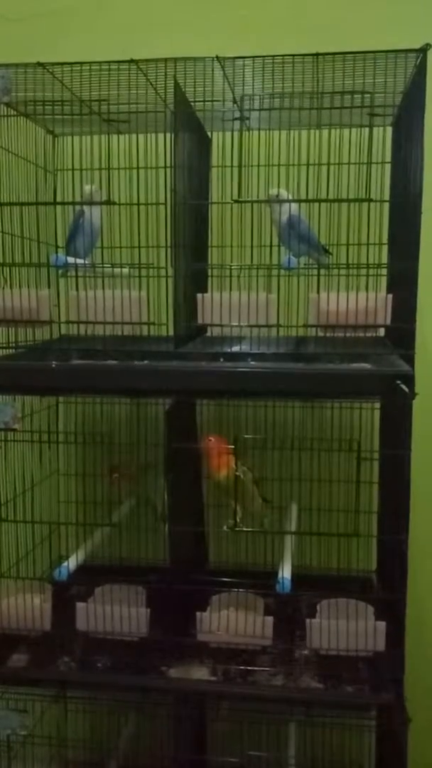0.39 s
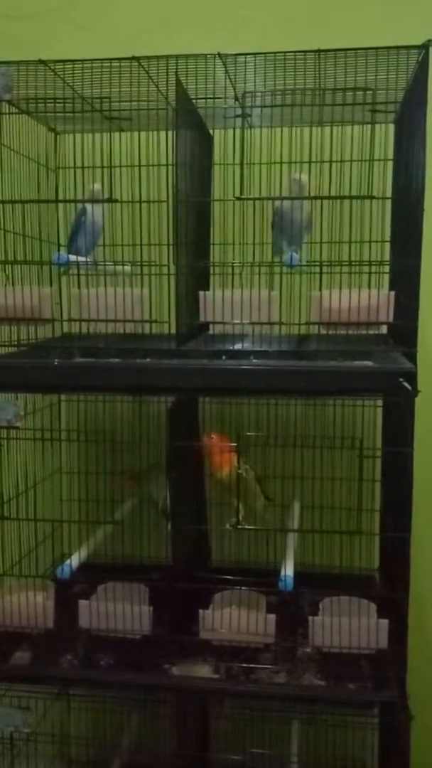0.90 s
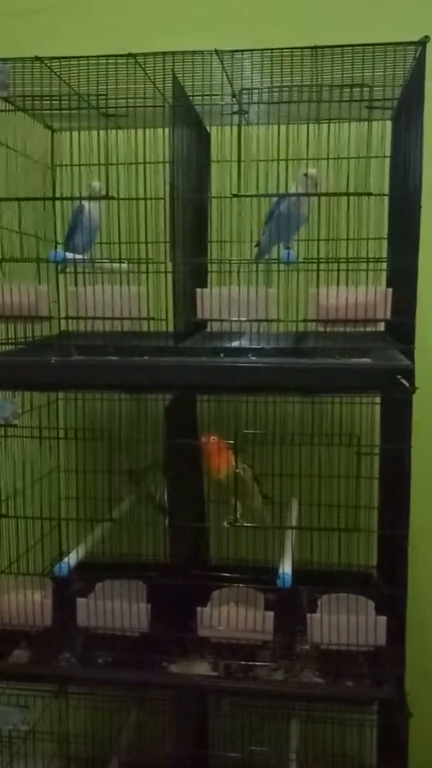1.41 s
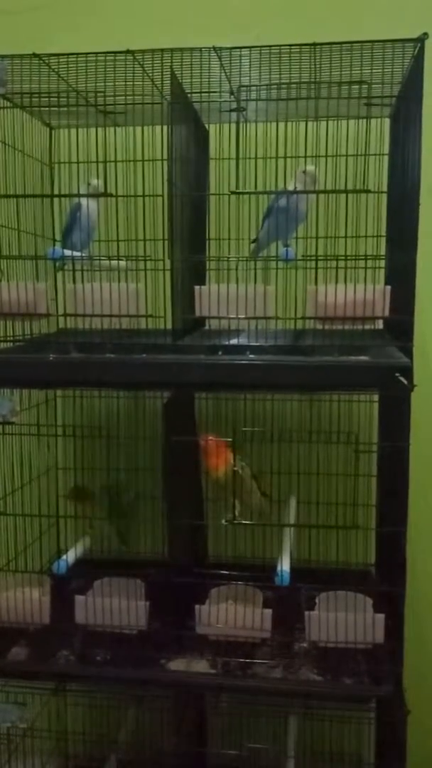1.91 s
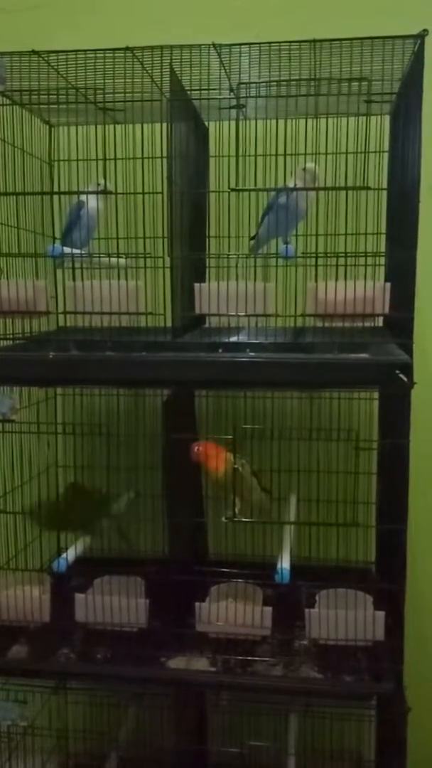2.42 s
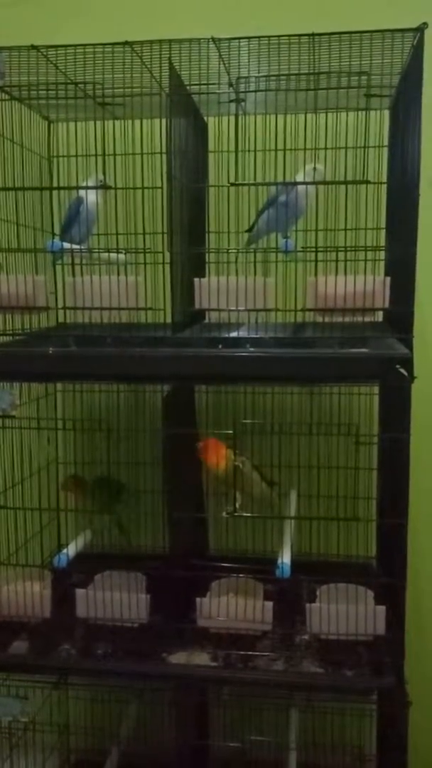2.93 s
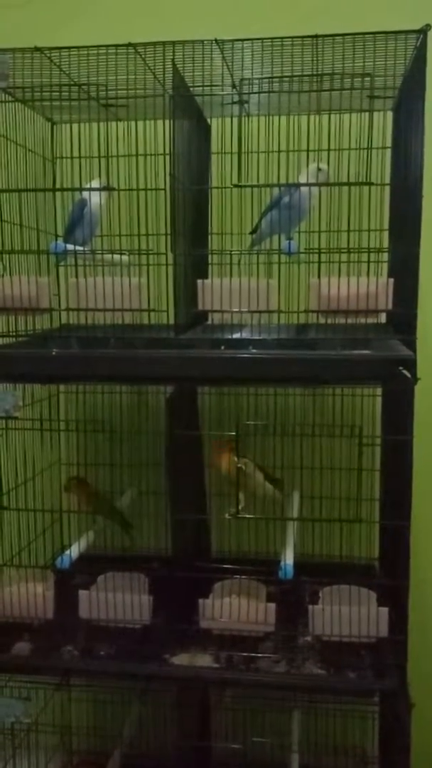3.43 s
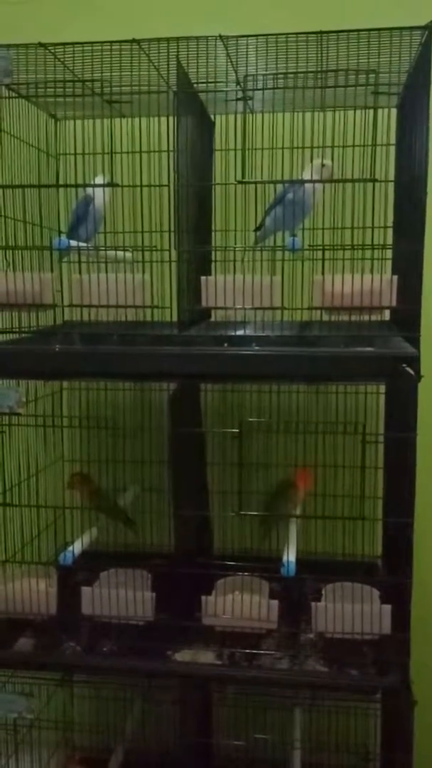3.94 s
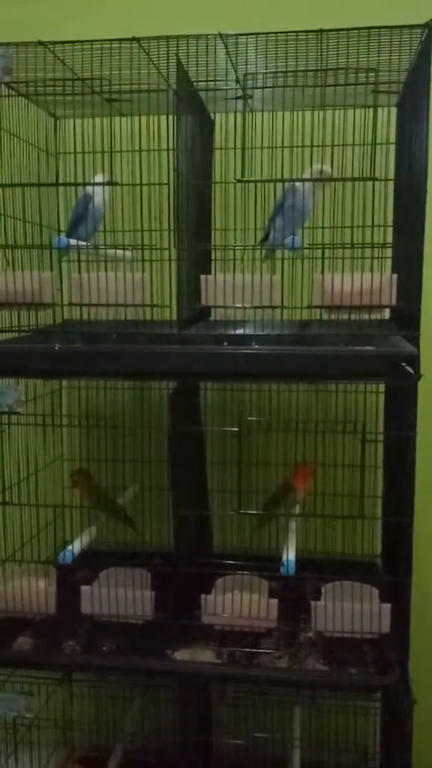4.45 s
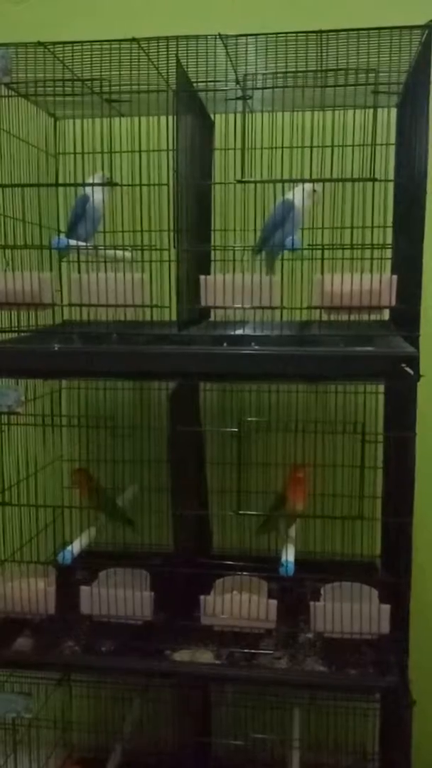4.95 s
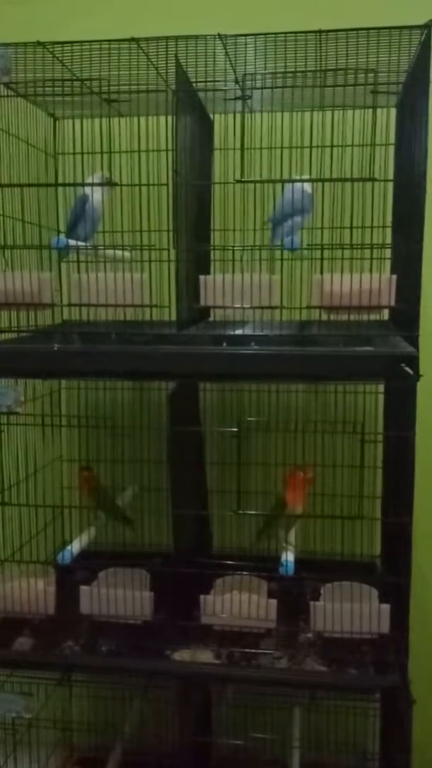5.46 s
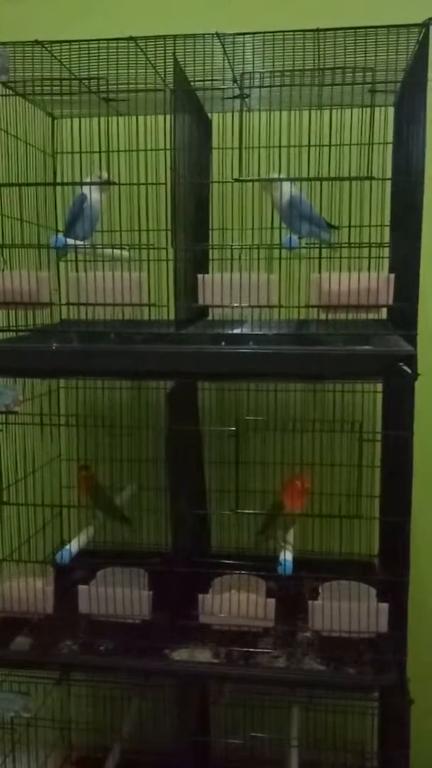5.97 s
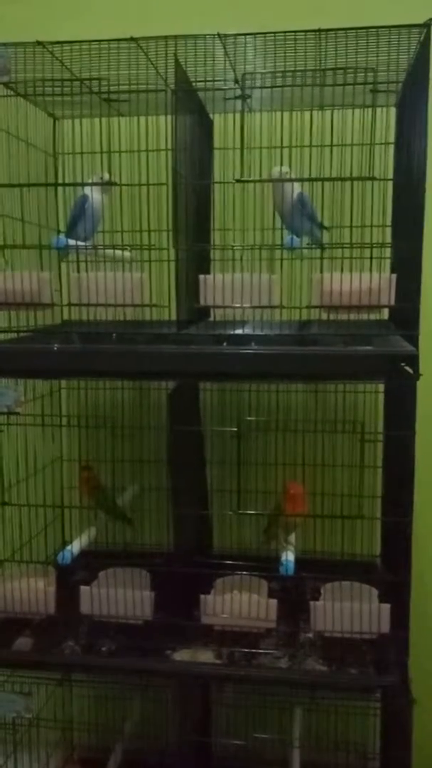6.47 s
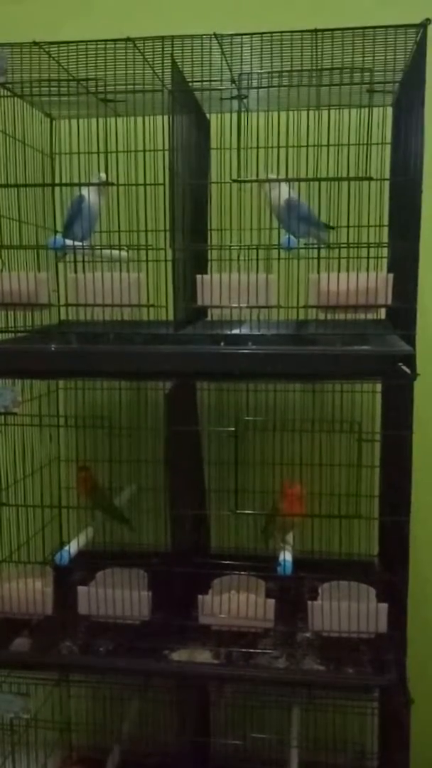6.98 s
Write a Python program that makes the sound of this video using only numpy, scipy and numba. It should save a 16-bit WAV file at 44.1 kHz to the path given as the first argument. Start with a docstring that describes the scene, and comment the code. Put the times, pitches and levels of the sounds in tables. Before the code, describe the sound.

Dense, high, husky chirping from a roomful of little parrots, sharp near calls over an echoing flock, with faint hum and dull thumps.

```python
"""Short husky whistles and squeaks of many small caged parrots, ringing between the walls of a bare room.
Close to a phone with two microphone ports, near birds sing gliding partials with rasp and flutter;
farther birds are heard only as echo, over a faint hum and dull thumps of filtered noise.
The loudest calls overload the microphone, and the recorder's gain control ducks at near calls,
cutting the echo, then creeps back."""
import sys
import numpy as np
from scipy import signal
from scipy.fft import rfft, irfft, next_fast_len
from scipy.io import wavfile
from scipy.ndimage import uniform_filter1d, minimum_filter1d
from numba import njit

SR = 44100
rng = np.random.default_rng(int(sys.argv[2]) if len(sys.argv) > 2 else 0)


def boost_factor(decibels):
    """Convert a level in decibels to a linear amplitude factor."""
    exponent = np.asarray(decibels, float) / 20
    return 10 ** exponent


def int16_out(signal):
    """Quantize to a 16-bit WAV file."""
    q = np.round(np.clip(np.atleast_2d(signal).T, -1, 1) * 32767)
    wavfile.write(sys.argv[1], SR, q.astype(np.int16))


N = 313992
MS = 1 / 1000  # seconds in a millisecond


def colour(x, points):
    """Filter by (freq_hz, gain_db) points joined on a log frequency axis."""
    hz, db = np.transpose(points)
    size = next_fast_len(x.shape[-1])
    freq = np.arange(size // 2 + 1) * SR / size + 1
    gain = boost_factor(np.interp(np.log(freq), np.log(hz), db))
    return irfft(rfft(x, size) * gain, size)[..., :x.shape[-1]]


def walk(rate_hz):
    """Random levels held for 1 / rate_hz seconds and smoothed twice; spread 1."""
    hold = int(SR / rate_hz)
    steps = np.repeat(rng.standard_normal(N // hold + 1), hold)
    smooth = uniform_filter1d(uniform_filter1d(steps, hold), hold)[:N]
    return smooth / smooth.std()


PLACES = 6  # perches, each with its own echo pattern
HUSK, WOBBLE = .6, .02  # depth of the rasp, relative pitch flutter
SCOOP, SCOOP_MS = .05, 2.5  # each note slides up into its pitch
PULSE_LO_HZ, PULSE_HI_HZ, PULSE_DEPTH = 170, 330, .35  # the rasp throbs, at a rate drawn for each note
PAN_SPREAD_DB = 3.0
# Partials between the overtones, heard with the lower octave.
# Columns: multiple [of the strong partial's pitch], level_db [dB against the lower octave]
HALF_STEPS = [(1.5, 7.5), (2.5, 11)]
# Overtones of the strong partial.
# Columns: multiple [of its pitch], level_db [dB against it]
OVERTONES = [(2, -5), (3, -4.5)]


def sing(notes):
    """Gliding whistles with overtones, lower octave, rasp and flutter; returns both ports and each perch."""
    ports, perches = np.zeros((2, N + SR)), np.zeros((PLACES, N + SR))
    rasp, flutter = walk(700), walk(550)
    chance = rng.random((len(notes), 3))
    for note, (side, skip, throat) in zip(notes, chance):
        start_s, length_ms, start_hz, end_hz, level_db, low_db, rough = note
        t = np.arange(int(length_ms * SR / 1000)) / SR
        u = t / t[-1]
        first = int(skip * (N - len(t)))
        own = slice(first, first + len(t))  # this note's piece of the rasp and flutter

        glide = start_hz + (end_hz - start_hz) * u
        scoop = SCOOP * np.exp(-t * 1000 / SCOOP_MS)
        hz = glide * (1 - scoop + rough * WOBBLE * flutter[own])
        phase = 2 * np.pi * np.cumsum(hz) / SR
        above = np.sin(phase) + sum(boost_factor(db) * np.sin(m * phase) for m, db in OVERTONES)
        below = np.sin(phase / 2) + sum(boost_factor(db) * np.sin(m * phase) for m, db in HALF_STEPS)

        swell = np.sin(np.pi * u ** 0.53) ** 0.28
        pulse_hz = PULSE_LO_HZ + (PULSE_HI_HZ - PULSE_LO_HZ) * throat
        pulse = 1 + rough * PULSE_DEPTH * np.sin(2 * np.pi * pulse_hz * t)
        shape = swell * (1 + rough * HUSK * rasp[own]) * pulse
        call = boost_factor(level_db) * shape * (above + boost_factor(low_db) * below)

        pan = boost_factor(PAN_SPREAD_DB * (2 * side - 1) * np.array([[1], [-1]]))
        at = int(start_s * SR)
        ports[:, at:][:, :len(t)] += pan * call
        perches[int(side * PLACES), at:][:len(t)] += call
    return ports[:, :N], perches[:, :N]


WHISTLE_LOW_DB, SQUAWK_LOW_DB = -56, -13  # lower octave against the strong partial
# Clear whistles from the near perches.
# Columns: start_s [s], length_ms [ms], start_hz [Hz], end_hz [Hz], level_db [dB before distance and gain]
WHISTLES = [(0.003, 12, 3100, 3080, -17.5), (6.212, 33, 2894, 2950, -23), (6.352, 39, 2405, 2350, -21.5),
            (3.201, 58, 4400, 4450, -17), (5.214, 36, 2494, 2380, -33), (0.002, 18.3, 6370, 6300, 5),
            (0.379, 31, 2544, 3860, -19.5), (0.398, 19.5, 3890, 4060, -10), (0.41, 36, 6620, 4750, -7),
            (0.649, 17.7, 6370, 6150, -6), (0.651, 30, 5164, 5390, -9.5), (0.728, 33, 5400, 5154, -1.5),
            (1.035, 46, 6950, 6930, -1.5), (1.398, 31, 5850, 6070, -13), (1.528, 32, 4015, 3840, -10.5),
            (1.532, 37, 2480, 2370, -23), (1.672, 53, 2945, 3650, -17), (1.733, 8.4, 3834, 3900, -10.5),
            (1.817, 24, 3870, 4080, -8), (1.855, 33, 4557, 4000, -5.5), (1.952, 14.5, 3565, 3240, -13.5),
            (2.023, 32.2, 3976, 4470, -17), (2.063, 9.1, 3407, 3870, -2), (2.074, 21, 4580, 4800, -3.5),
            (2.135, 52, 3810, 4042, -10.5), (1.885, 25, 6300, 6340, -7), (1.994, 15.7, 6550, 6490, -3.5),
            (2.093, 18, 6550, 6470, -1), (2.218, 25, 6150, 6260, -7.5), (2.229, 26, 4720, 4370, -7),
            (2.254, 44, 4000, 4174, 0.5), (2.259, 30, 3580, 3605, -4.5), (2.272, 20, 4620, 4860, -11),
            (2.318, 17.6, 4480, 4450, -2.5), (2.349, 28, 3043, 3154, -8), (2.495, 15.8, 5630, 5330, -2.5),
            (2.511, 19.4, 7100, 7020, -13), (2.535, 27, 6700, 6460, -2.5), (2.733, 22, 5750, 5850, -13),
            (2.845, 41, 5850, 6000, -11.5), (2.955, 40, 6600, 6860, -2), (3.05, 40, 6700, 6900, -5),
            (3.322, 55, 3516, 3975, -14.5), (3.345, 45, 4656, 4410, -5.5), (3.632, 22, 2500, 3200, -14.5),
            (3.659, 40, 5345, 5360, -13.5), (1.055, 42, 3890, 4020, -14), (1.09, 54, 4780, 5000, -12),
            (7.004, 30, 3150, 3214, -10.5), (1.555, 39, 2454, 2434, -16), (3.762, 24, 3800, 3980, -10),
            (3.875, 38, 4300, 4496, -2), (3.917, 27, 6450, 6200, 1.5), (3.605, 17, 4700, 4880, -17),
            (3.645, 18.6, 6200, 5730, -1.5), (3.721, 30, 6500, 6340, -9), (4.039, 33, 6360, 6294, 3.5),
            (4.36, 36, 4000, 3900, -22), (4.664, 34, 7140, 6320, -3), (4.684, 102, 6000, 5250, -5.5),
            (5.264, 59, 3400, 3305, -18), (5.335, 33, 6050, 6170, -1.5), (5.336, 59, 5274, 5360, -5.5),
            (5.493, 25, 4450, 4220, -17), (5.497, 38, 6450, 6470, -4.5), (5.544, 26, 5600, 6010, -6),
            (5.577, 25, 3000, 3810, -19), (5.589, 29, 4850, 4770, -14.5), (5.615, 40, 6540, 6160, -9),
            (6.098, 34, 4500, 4375, -14), (6.168, 32, 4000, 3530, -25), (6.149, 37, 4500, 5260, -13.5),
            (6.311, 51, 3847, 3900, -17), (6.42, 27, 3130, 3330, -19), (6.43, 30, 6300, 6830, -8),
            (6.63, 45, 6400, 6320, -12.5), (6.445, 41, 4190, 3710, -22), (6.531, 47, 5060, 4920, -11),
            (6.556, 45, 3900, 3915, -12.5), (6.723, 39, 4154, 4280, -11.5), (6.814, 27, 4170, 4326, -8),
            (6.889, 20, 4475, 4095, -8.5), (6.994, 13.5, 2300, 3230, -13.5), (7.036, 43, 6325, 6420, 0)]


def whistles():
    """Clear notes: almost all the sound is in the strong partial and its overtones."""
    return [(*note, WHISTLE_LOW_DB, 1) for note in WHISTLES]


# Hoarse squawks from the near perches.
# Columns: start_s [s], length_ms [ms], start_hz [Hz], end_hz [Hz], level_db [dB before distance and gain]
SQUAWKS = [(0.003, 26.2, 4250, 5300, -13), (3.5, 28, 5000, 5400, -22), (1.614, 38, 5280, 5770, -6.5),
           (1.6, 63, 4100, 4575, -6.5), (1.755, 46, 4750, 4500, -8.5), (2.1, 42, 6140, 4400, -15),
           (3.79, 30, 6000, 5800, -3), (5.2, 40, 5500, 4350, -1), (5.473, 44, 2700, 3900, -26.5),
           (6.4, 28, 2600, 3900, -25), (6.683, 31, 4400, 4800, -10), (7.005, 30, 5850, 6000, -6),
           (6.916, 35, 6050, 6200, -12), (5.3, 39, 6900, 5100, -11), (7.082, 30, 5100, 3300, -7.5)]


def squawks():
    """Hoarse notes: a strong lower octave fills in between the overtones."""
    return [(*note, SQUAWK_LOW_DB, 1) for note in SQUAWKS]


FLOCK_PER_S, FLOCK_SPREAD_DB = 200, 3.5
FLOCK_LO_HZ, FLOCK_HI_HZ = 2267, 6925
FLOCK_ROUGH = 1.7  # rasp and flutter of the far squeaks
FLOCK_TILT_DB = 7  # high squeaks louder than low ones, per octave
# Background at the far end of the room, for the flock here and for hum() below.
# Columns: time_s [s], flock_db [dB before the echo and gain], hum_db [dB before the microphone and gain]
BACKGROUND = [(0, -24, -33.5), (.3, -40, -30), (.6, -29.5, -35), (.9, -24.5, -33.5), (1.2, -22.5, -34),
              (1.45, -24, -37), (1.65, -16, -35), (1.9, -17, -49), (2.3, -17, -42), (2.65, -28, -56),
              (3.1, -19, -41), (3.7, -21.5, -35), (4.1, -25, -35), (4.4, -21.5, -37.5), (4.75, -28.5, -37),
              (5.0, -44, -46), (5.35, -32.5, -33), (5.7, -22, -37), (5.95, -26, -38.5),
              (6.12, -44.5, -35.5), (6.3, -19.5, -38.5), (6.8, -19, -43.5), (7.1, -15, -35.5)]


def flock():
    """Quick squeaks of the farther birds, at random moments and pitches, mostly high."""
    count = int(FLOCK_PER_S * N / SR)
    when, pitch, glide, size, loud = rng.random((count, 5)).T
    start_s = when * N / SR
    length_ms = 8 + 16 * size
    start_hz = FLOCK_LO_HZ + (FLOCK_HI_HZ - FLOCK_LO_HZ) * pitch ** .75
    end_hz = start_hz * (.88 + 0.2393 * glide)
    time_s, flock_db, _ = np.transpose(BACKGROUND)
    level_db = np.interp(start_s, time_s, flock_db) + FLOCK_SPREAD_DB * (2 * loud - 1)
    level_db = level_db + FLOCK_TILT_DB * np.log2(start_hz / 4500)
    low_db, rough = np.full(count, -30.0), np.full(count, FLOCK_ROUGH)
    return np.transpose([start_s, length_ms, start_hz, end_hz, level_db, low_db, rough])


# Times for each decay to fall 60 dB, and the gap before the first echo.
ROOM_T60_S, EARLY_T60_S, EARLY_DB, ROOM_GAP_MS = 0.69, 0.034, 8.5, 1.4


def walls(perches):
    """Strong early echoes, then a dense tail, as decaying noise; different for each perch and port."""
    t = np.arange(SR) / SR
    early = boost_factor(EARLY_DB) * np.exp(-np.log(1000) * t / EARLY_T60_S)
    late = np.exp(-np.log(1000) * t / ROOM_T60_S)
    tail = rng.standard_normal((2, PLACES, SR)) * (early + late) * (t > ROOM_GAP_MS / 1000)
    tail /= np.sqrt(np.sum(tail ** 2, axis=2, keepdims=True))
    return signal.fftconvolve(perches[None], tail, axes=2).sum(axis=1)[:, :N]


HUM_PATCHY_DB, HUM_SWELL_DB = 3.0, 3.0  # wavering of each band alone, of all together
# Spectrum of the room hum; hum_db in BACKGROUND sets its level.
# Columns: freq_hz [Hz], density_db [dB per Hz, relative]
HUM = [(30, -27), (105, -11.5), (140, -3.5), (185, -13.5), (300, -9), (550, -14.5), (1500, -16.5),
       (4000, -20)]


def hum():
    """Low room noise whose bands waver on their own; partly shared by both ports."""
    shared, left, right = rng.standard_normal((3, N))
    noise = colour(np.array([left, right]) + shared, HUM)
    edges_hz = 45 * 1.5 ** np.arange(14)
    patchy = 0
    for pair in zip(edges_hz, edges_hz[1:]):
        band = signal.sosfilt(signal.butter(2, pair, "band", fs=SR, output="sos"), noise)
        patchy = patchy + boost_factor(HUM_PATCHY_DB * walk(9)) * band
    time_s, _, hum_db = np.transpose(BACKGROUND)
    level_db = np.interp(np.arange(N) / SR, time_s, hum_db) + HUM_SWELL_DB * walk(6)
    return patchy / patchy.std() * boost_factor(level_db)


THUMP_MS, THUMP_HZ, THUMP_RIGHT_DB = 12.0, 420.0, -5.0  # time to the peak, low-pass corner
# Dull thumps, strongest at the left port.
# Columns: start_s [s], level_db [dB at the peak of the swell, before the microphone and gain]
THUMPS = [(0.0, -35), (0.471, -19.5), (0.98, -24), (1.472, -19), (1.832, -31), (1.991, -33), (2.092, -34),
          (2.946, -32.5), (3.499, -35), (3.664, -24), (3.793, -24), (3.914, -26), (4.053, -38),
          (4.43, -27.5), (4.71, -28), (4.863, -23), (5.213, -23), (5.519, -31.5), (5.731, -19.5),
          (6.068, -35), (6.259, -23), (7.021, -25)]


def thumps():
    """Short swells of low-passed noise, each rising quickly and dying away."""
    t = np.arange(N) / SR
    swell = 0
    for start_s, level_db in THUMPS:
        u = np.maximum(t - start_s, 0) * 1000 / THUMP_MS
        swell = swell + boost_factor(level_db) * u * np.exp(1 - u)
    low_pass = signal.butter(1, THUMP_HZ, fs=SR, output="sos")
    low = signal.sosfilt(low_pass, rng.standard_normal((2, N)))
    return swell * low / low.std() * boost_factor([[0], [THUMP_RIGHT_DB]])


SNAP_MS, SNAP_FROM_HZ, SNAP_DB = 4.2, 2900, -13.5  # stepped calls have a very fast upward sweep
PIP_HZ, PIP_MS, DOWN_MS, DOWN_LOW_DB = 6196, 16.8, 27, -36.5
DOWN_ROUGH = .7  # share of rasp and flutter in the steady whistle
# Near calls that step down, a high pip and then a steady whistle; levels before distance and gain.
# Columns: start_s [s], gap_ms [ms from pip to whistle], pip_db [dB], whistle_hz [Hz], whistle_db [dB]
STEPS_DOWN = [(0.245, 5.5, -22, 4970, 1), (4.273, 5.2, -4, 4845, -1.5), (4.52, 3, -0.5, 4883, 1.5),
              (4.868, 4.45, 1.5, 4760, 4), (4.934, 0.95, -4, 4680, -14), (5.062, 12.7, -6.5, 5315, -6.5),
              (5.176, 31.6, 6, 4784, -2.5)]


def steps_down():
    """A snap sweeps up into a high pip, then a lower, steadier whistle follows."""
    notes = []
    for start_s, gap_ms, pip_db, hz, level_db in STEPS_DOWN:
        notes += [(start_s - SNAP_MS * MS, SNAP_MS, SNAP_FROM_HZ, PIP_HZ, pip_db + SNAP_DB, WHISTLE_LOW_DB, 1),
                  (start_s, PIP_MS, PIP_HZ, PIP_HZ, pip_db, DOWN_LOW_DB, 1),
                  (start_s + gap_ms * MS, DOWN_MS, hz, hz, level_db, DOWN_LOW_DB, DOWN_ROUGH)]
    return notes


UP_GAP_MS, UP_LOW_MS, UP_HIGH_MS, UP_HIGH_LOW_DB = 19, 20.94, 33, -24
UP_SAG = 0.026  # relative fall in pitch over each note
# Near calls that step up, a hoarse note and then a clearer high one; levels before distance and gain.
# Columns: start_s [s], low_hz [Hz], low_db [dB], high_hz [Hz], high_db [dB]
STEPS_UP = [(0.449, 4590, -3, 6214, 5), (0.96, 4487, -3, 6263, 7), (1.444, 4287, -7, 6232, 3.5),
            (1.966, 4660, -17, 6390, -5.5), (3.44, 4490, -19, 6436, -1), (3.651, 5170, -4, 6640, -3),
            (3.776, 4770, -5.5, 6510, -4), (5.709, 4400, -7.5, 5946, 5), (5.844, 4430, -12, 6700, -1),
            (6.23, 4310, -6, 5855, -1)]


def steps_up():
    """A hoarse sagging note, then a snap sweeps up into a clearer high one."""
    sharp, flat = 1 + UP_SAG / 2, 1 - UP_SAG / 2
    notes = []
    for start_s, low_hz, low_db, high_hz, high_db in STEPS_UP:
        high_s = start_s + UP_GAP_MS * MS
        notes += [(start_s, UP_LOW_MS, low_hz * sharp, low_hz * flat, low_db, SQUAWK_LOW_DB, 1),
                  (high_s - SNAP_MS * MS, SNAP_MS, SNAP_FROM_HZ, high_hz, high_db + SNAP_DB, WHISTLE_LOW_DB, 1),
                  (high_s, UP_HIGH_MS, high_hz * sharp, high_hz * flat, high_db, UP_HIGH_LOW_DB, 1)]
    return notes


FLICK_MS, FLICK_FROM_HZ, FLICK_TO_HZ, FLICK_DB = 11, 3100, 4700, -3
HOLD_AFTER_MS, HOLD_MS, HOLD_FROM_HZ, HOLD_TO_HZ = 9, 28, 4250, 4450
RUN_ROUGH = .85  # share of rasp and flutter
# One bird's even run of chirps.
# Columns: start_s [s], level_db [dB before distance and gain]
RUN = [(2.576, -2), (2.665, -4.5), (2.754, -2), (2.848, -5), (2.941, -3), (3.034, -2.5), (3.134, -3.5)]


def chirp_run():
    """Each chirp is an upward flick into a held note."""
    notes = []
    for start_s, level_db in RUN:
        hold_s = start_s + HOLD_AFTER_MS * MS
        notes += [(start_s, FLICK_MS, FLICK_FROM_HZ, FLICK_TO_HZ, level_db + FLICK_DB, WHISTLE_LOW_DB, RUN_ROUGH),
                  (hold_s, HOLD_MS, HOLD_FROM_HZ, HOLD_TO_HZ, level_db, WHISTLE_LOW_DB, RUN_ROUGH)]
    return notes


LONE_SNAP_MS, LONE_SNAP_FROM_HZ, LONE_SNAP_LOW_DB = 9, 4500, -8.5
# Lone snaps from the near perches.
# Columns: start_s [s], top_hz [Hz], level_db [dB before distance and gain]
SNAPS = [(3.631, 6280, -11.5), (3.906, 5980, -2), (4.036, 6200, -13.5), (4.233, 5640, -12.5),
         (4.357, 4700, -17.5), (4.672, 6280, -5.5), (6.414, 6270, -15), (6.809, 4950, -22),
         (6.908, 5900, -16.5), (6.995, 6390, -6)]


def snaps():
    """A harsh and very fast upward sweep with a strong lower octave."""
    return [(start_s, LONE_SNAP_MS, min(LONE_SNAP_FROM_HZ, top_hz / 1.3), top_hz, level_db, LONE_SNAP_LOW_DB, 1)
            for start_s, top_hz, level_db in SNAPS]


@njit
def hold_peaks(x, keep):
    """Jumps up with x at once, closes on a lower x by the factor keep per sample."""
    held, level = np.empty(len(x)), 0.
    for i in range(len(x)):
        level = x[i] if x[i] > level else x[i] + keep * (level - x[i])
        held[i] = level
    return held


GAIN_FROM_DB, GAIN_BOOST_DB, GAIN_RATIO = -26.5, 6.5, 2.8  # threshold, gain for quiet sound, compression
SENSE_MS, DROP_MS, RECOVER_MS = 4.8, 10.5, 171  # averaging, look-ahead fall, time constant of the return


def gain_control(x):
    """Turns the level down just ahead of loud sound, then lets it creep back."""
    ms = SR / 1000
    power = uniform_filter1d(np.mean(x ** 2, axis=0), int(SENSE_MS * ms))
    level_db = 10 * np.log10(power.clip(1e-12))
    excess_db = np.maximum(level_db - GAIN_FROM_DB, 0)
    cut_db = hold_peaks((1 - 1 / GAIN_RATIO) * excess_db, np.exp(-1 / (RECOVER_MS * ms)))
    ahead = int(DROP_MS * ms)
    early_cut_db = np.append(cut_db[ahead:], np.full(ahead, cut_db[-1]))
    return x * boost_factor(GAIN_BOOST_DB - uniform_filter1d(early_cut_db, ahead))


def limit(x):
    """Peak limiter: a smooth gain dip keeps the loudest moments just under full scale."""
    headroom = np.minimum(.97 / (np.abs(x).max(axis=0) + 1e-9), 1)
    return x * uniform_filter1d(minimum_filter1d(headroom, size=441), size=441)


DIRECT_DB, ROOM_DB = -6.5, 0  # direct path, echo
RIGHT_DB, RIGHT_LAG_SAMPLES = -5.8, 1  # right port against the left


def scene():
    """Near birds direct and echoed, far birds only echoed, over hum and thumps."""
    near_notes = whistles() + squawks() + steps_down() + steps_up() + chirp_run() + snaps()
    near, near_perches = sing(near_notes)
    near[1] = np.roll(near[1], RIGHT_LAG_SAMPLES)
    _, far_perches = sing(flock())
    birds = boost_factor(DIRECT_DB) * near + boost_factor(ROOM_DB) * walls(near_perches + far_perches)
    return (birds + hum() + thumps()) * boost_factor([[0], [RIGHT_DB]])


def roll_off(x):
    """The treble ends steeply here."""
    return signal.sosfilt(signal.butter(12, 15570, fs=SR, output="sos"), x)


BEND_LEFT_DB, BEND_RIGHT_DB = -29.0, -29.0  # square-law overload of each port
# Response of the phone's microphone.
# Columns: freq_hz [Hz], gain_db [dB]
MIC = [(1000, 0.5), (1700, -1), (2000, 3), (4500, 4), (6400, -3), (7000, -7.5), (7600, -16), (8500, -23),
       (10000, -25), (13000, -28), (15500, -31)]


def record(dry):
    """Overload adds a thump and an octave to loud notes; the microphone dulls steeply above its peak."""
    bent = dry + boost_factor([[BEND_LEFT_DB], [BEND_RIGHT_DB]]) * dry ** 2
    high_pass = signal.butter(2, 90, "high", fs=SR, output="sos")
    heard = colour(signal.sosfilt(high_pass, bent), MIC)
    finished = limit(gain_control(heard))
    return roll_off(finished)


dry = scene()
out = record(dry)
int16_out(out)
```